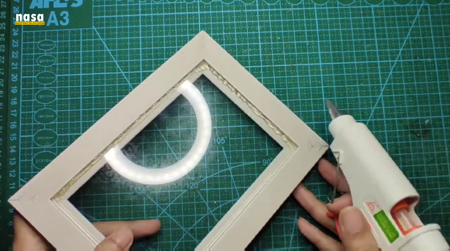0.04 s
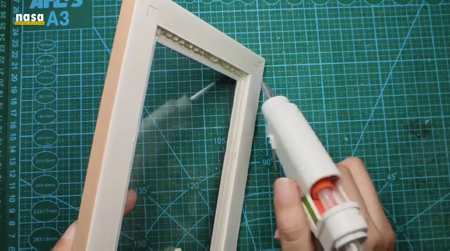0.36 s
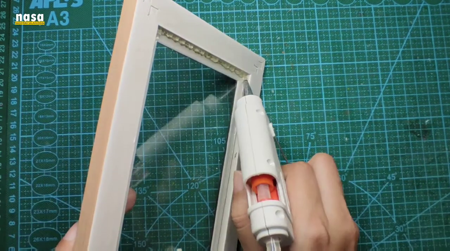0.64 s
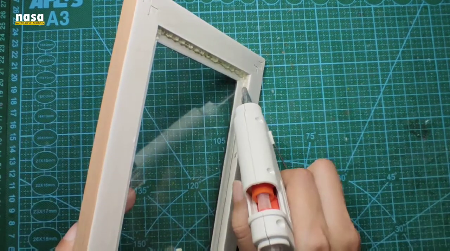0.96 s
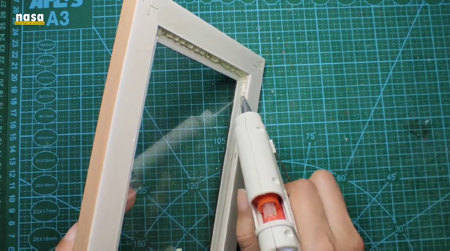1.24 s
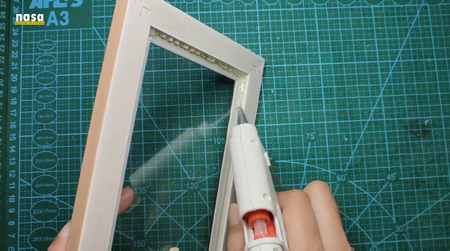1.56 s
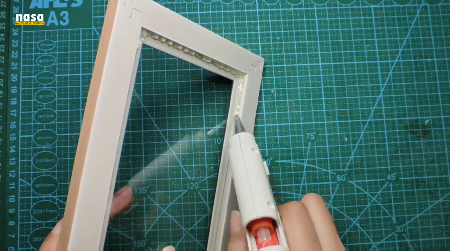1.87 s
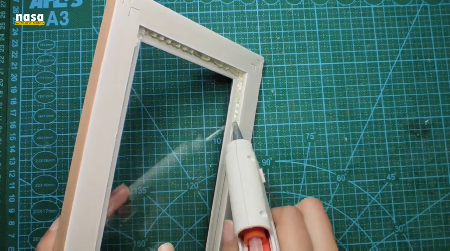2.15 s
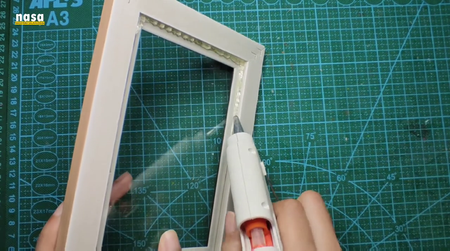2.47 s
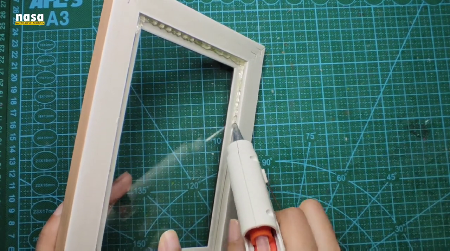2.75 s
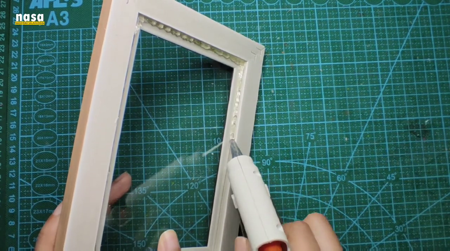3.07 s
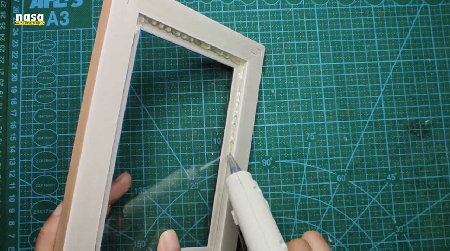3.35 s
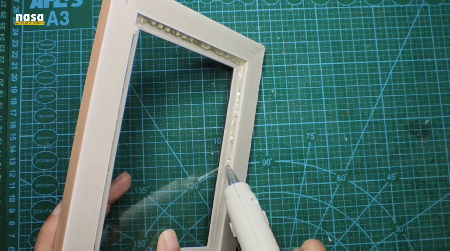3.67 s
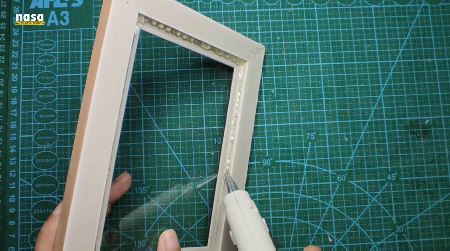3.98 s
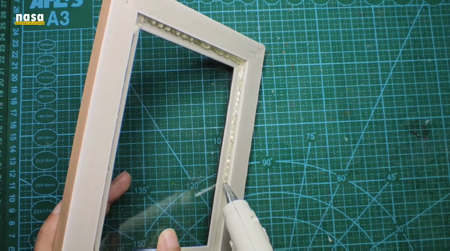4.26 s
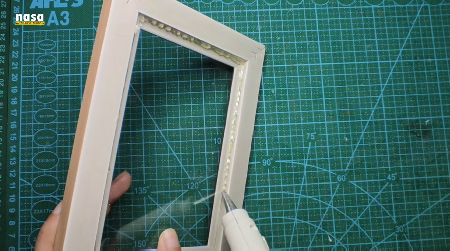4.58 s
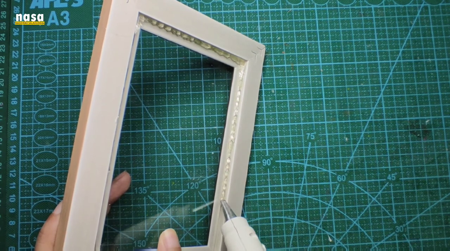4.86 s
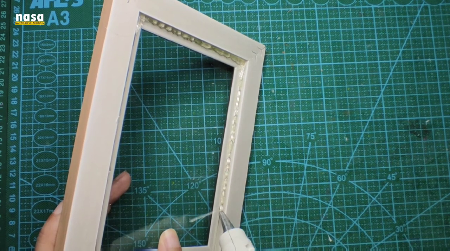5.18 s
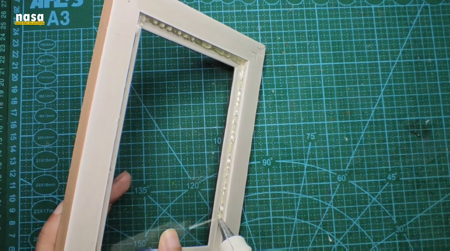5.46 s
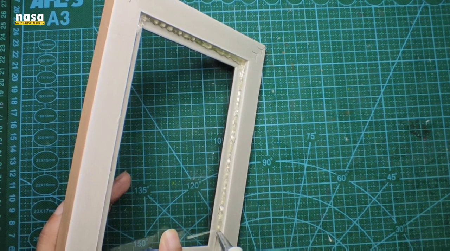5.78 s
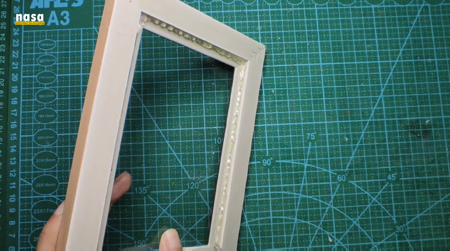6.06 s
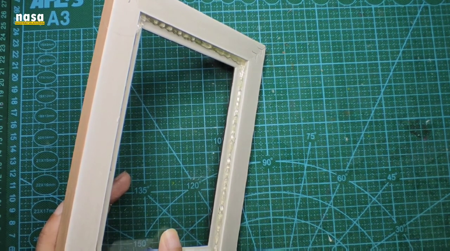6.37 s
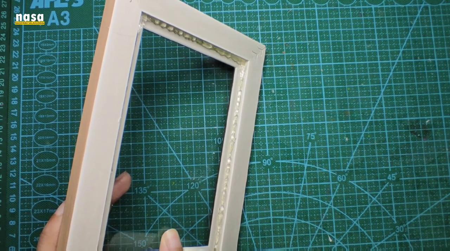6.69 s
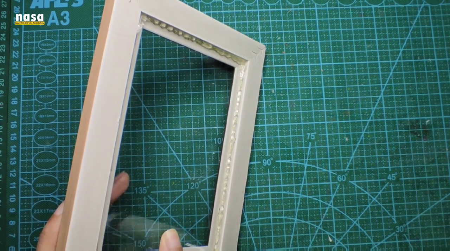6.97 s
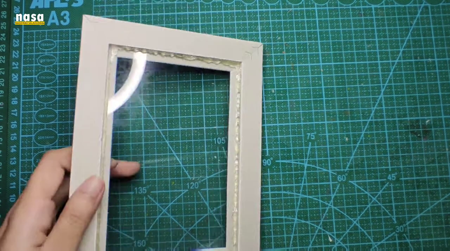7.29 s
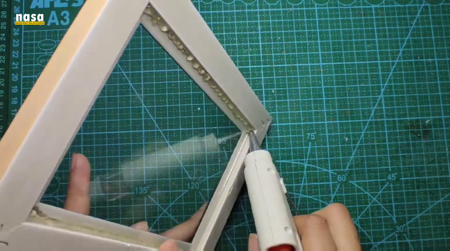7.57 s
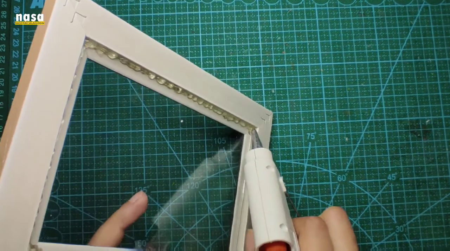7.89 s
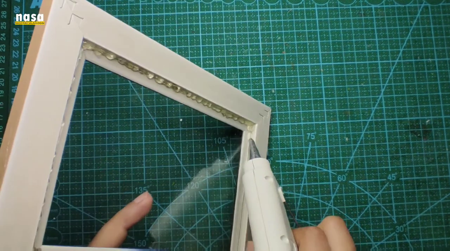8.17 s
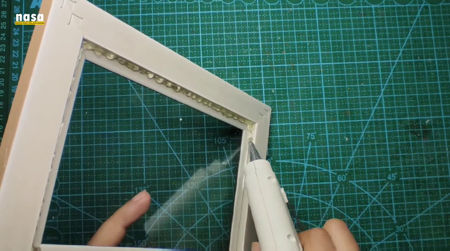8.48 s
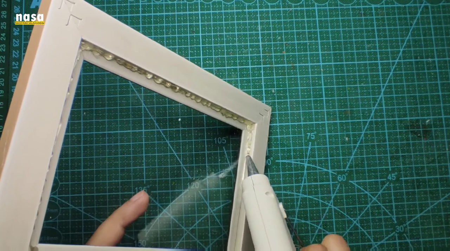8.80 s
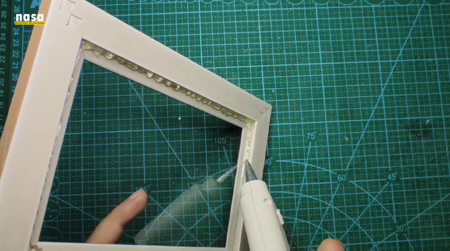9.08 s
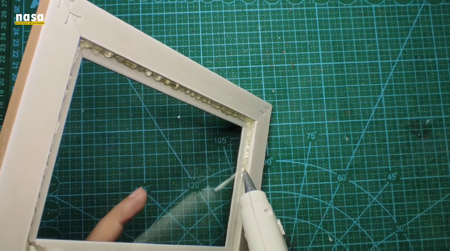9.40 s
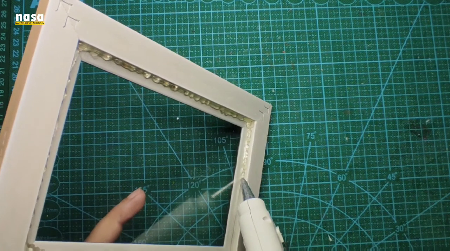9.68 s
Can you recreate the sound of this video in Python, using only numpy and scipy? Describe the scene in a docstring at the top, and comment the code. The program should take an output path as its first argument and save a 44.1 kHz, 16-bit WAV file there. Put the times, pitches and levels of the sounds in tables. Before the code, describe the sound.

Small plastic creaks, ticks and faint spring squeaks from a glue gun, with soft table thuds and uneven rumbling underneath.

```python
"""A wooden picture frame taps down and slides over the mat of a thudding craft table; then a hot glue
gun creaks close by as it lays a bead. Each squeeze of the trigger is a run of tiny stick-slip pulses
that ring the plastic shell, and its spring squeaks softly and ticks between squeezes.
Hands and frame jostle the table, which thuds, judders and rumbles; the rumble lulls at a hard squeeze.
Under it all lie a faint rustle of skin and the steady air of the room."""
import sys
import numpy as np
from scipy import signal
from scipy.fft import rfft, irfft, next_fast_len
from scipy.io import wavfile
from scipy.ndimage import map_coordinates

SR = 44100
rng = np.random.default_rng(int(sys.argv[2]) if len(sys.argv) > 2 else 0)


def waveform_to_disk(signal):
    """Save audio, clipped to [-1, 1], as 16-bit WAV at the path in sys.argv[1]."""
    frames = np.transpose(np.atleast_2d(signal))
    scaled = np.clip(frames, -1, 1) * 32767
    samples = np.round(scaled).astype(np.int16)
    wavfile.write(sys.argv[1], SR, samples)


N = 429534

# Levels in all tables are relative; each source applies its own gain.
# trigger creaks: t/s, duration/s (0 is a single click), slip level/dB
CREAKS = [(0.837, 0.017, -38.5), (.961, 0.0027, -34), (1.389, 0, -35), (1.4357, 0, -32),
          (1.455, 0.00085, -36), (1.483, 0.026, -44.5), (1.516, 0.0019, -32), (1.664, 0.034, -34.5),
          (1.72, 0.009, -41), (1.752, 0, -32), (1.912, 0.005, -44), (2.546, 0.019, -39),
          (2.776, 0.0038, -29), (2.818, 0.0031, -33), (3.042, 0.00084, -33.5), (3.2276, 0.0023, -39),
          (3.3794, 0.02, -41), (3.407, 0.011, -35.5), (3.436, 0.0025, -28), (3.4928, 0.011, -37),
          (3.7303, 0.04, -31), (4.111, 0.0019, -39), (4.131, 0.024, -33), (4.1963, 0.013, -33.5),
          (4.407, 0.015, -44.5), (4.432, 0.018, -32.5), (4.609, 0.016, -33), (4.7943, 0.016, -33),
          (4.984, 0.028, -34.5), (5.101, 0.0054, -35.5), (5.291, 0.0003, -29.5), (5.466, 0.019, -33),
          (5.5043, 0.002, -31.5), (5.628, 0.019, -35), (5.815, .019, -33), (5.869, 0.013, -32),
          (6.093, 0.018, -39), (6.325, 0.0046, -38.5), (6.74, 0.015, -32.5), (6.776, 0.00077, -30),
          (6.8835, 0, -33), (8.19, 0.0042, -47.5), (8.253, 0.0016, -38.5), (8.531, 0.0064, -32),
          (8.685, 0.0049, -27.5), (8.745, 0.0095, -36.5), (9.0, 0.0025, -41), (9.013, 0.018, -44.5),
          (9.1456, 0.019, -35.5), (9.375, 0.016, -38), (9.5, 0, -33), (9.554, 0.0059, -41.5)]
# dull knocks through the table: t/s, level/dB
KNOCKS = [(.073, -17), (0.193, -20), (.341, -21.5), (0.422, -28.5), (.482, -20), (0.678, -16.5),
          (.809, -16), (0.919, -26), (1.027, -18), (1.157, -17), (1.195, -17), (1.261, -28.5), (1.438, -26),
          (1.468, -27), (1.641, -17), (1.706, -21.5), (1.772, -21.5), (1.926, -30.5), (1.955, -25.5),
          (2.035, -19.5), (2.091, -17), (2.189, -31), (2.304, -21.5), (2.492, -21), (2.565, -16),
          (2.669, -18.5), (2.942, -16), (3.367, -23), (3.413, -18.5), (3.506, -19), (3.614, -20.5),
          (3.922, -33.5), (3.967, -27), (4.022, -29), (4.107, -21), (4.163, -25), (4.246, -14.5),
          (4.354, -20), (4.412, -20), (4.469, -23), (4.54, -22), (4.715, -24.5), (4.817, -25), (5.005, -17),
          (5.046, -29.5), (5.19, -23.5), (5.716, -26.5), (5.779, -28.5), (5.963, -27), (6.13, -23),
          (6.257, -21.5), (6.36, -16.5), (6.391, -23.5), (6.825, -26), (6.947, -30), (7.087, -25.5),
          (7.143, -28.5), (7.19, -27.5), (7.283, -25), (7.335, -23.5), (7.466, -25), (7.584, -25.5),
          (7.645, -22), (7.74, -29.5), (7.846, -30), (7.945, -27), (8.039, -25), (8.14, -22), (8.24, -19.5),
          (8.287, -30), (8.468, -24), (8.533, -28), (8.812, -25), (9.004, -17), (9.16, -25.5),
          (9.213, -21.5), (9.344, -18.5), (9.523, -17.5)]
# modes of the trigger spring: f/Hz, bandwidth/Hz, level/dB
SPRING_MODES = [(2460, 340, 3.5), (4426, 790, 2.5), (6270, 450, -4), (7200, 590, 3), (8080, 340, 1.5),
                (9180, 480, 1)]
# spectrum of the table top's vibration: f/Hz, level/dB
TOP_SPECTRUM = [(40, -24), (100, -1.5), (165, 4), (250, -5.5), (400, -20.5), (560, -30), (1500, -68),
                (5000, -120)]
# spectrum of the table's slow sway: f/Hz, level/dB
SWAY_SPECTRUM = [(12, -22), (28, 0.5), (55, -4.5), (90, -4), (130, -23.5), (400, -89), (2000, -120)]
# spectrum of skin friction: f/Hz, level/dB
SKIN_SPECTRUM = [(2000, -5), (4000, -13), (7500, -1.5), (9200, -3), (10500, -21), (16000, -35.5)]


def trigger(first_gap_s=0.0033, slowing=1.27, max_gaps=16, alike=0.63,
            swell_db=5, arch_db=5, scatter_db=2.5, level_db=-3):
    """Stick-slip friction: gaps widen as a squeeze slows, and the slips tend to peak past its middle."""
    slips = np.zeros(N)
    for onset, duration, db in CREAKS:
        jitter, scatter = rng.standard_normal((2, max_gaps))
        grains = rng.standard_normal((max_gaps + 2, SR // 10))
        gaps = first_gap_s * slowing ** np.arange(max_gaps) * np.exp(0.15 * jitter)
        times = np.append(0, np.cumsum(gaps))
        count = np.argmin(np.abs(times - duration)) + 1
        progress = times[:count] / max(times[count - 1], 1e-6)
        start = onset - grains.shape[1] // 4 / SR
        for u, luck, own in zip(progress, scatter, grains):
            # the slips of one creak share a contact point, so part of their waveform
            grain = np.sqrt(alike) * grains[-1] + np.sqrt(1 - alike) * own
            strain_db = swell_db * (u - 0.5) + arch_db * (np.sin(np.pi * u) - 0.5) + scatter_db * luck
            gain = amp(db + level_db + strain_db * (count > 2))
            add(slips, start + u * duration, gain * slip(grain))
    return shell(slips)


def slip(grain, rise_s=0.00091, creep_s=0.0022, rattle_t60=0.064, ring_t60=0.074):
    """Release of strain: gritty creep, a snap a quarter into the grain, then a rattle and a faint ring."""
    t = (np.arange(len(grain)) - len(grain) // 4) / SR
    after = np.maximum(t, 0)
    creep = amp(-19) * np.exp(-np.abs(t) / creep_s)
    snap = (after / rise_s * np.exp(1 - after / rise_s)) ** 2
    tail = amp(-14 - 60 * after / rattle_t60) + amp(-27 - 60 * after / ring_t60)
    envelope = snap + np.where(t < 0, creep, tail)
    burst = envelope * grain
    return burst * np.sqrt(np.sum(envelope ** 2) / np.sum(burst ** 2))


def shell(slips, chirp_s=0.00158, chirp_top_hz=10100, body_hz=6500, grip_db=3.5):
    """Resonance: slips ring the gun's shell, while the shifting grip varies its body and each mode."""
    # spectrum of the plastic shell: f/Hz, level/dB
    spectrum = [(500, -22), (1200, -18), (2000, -24), (3200, -19.5), (4500, -15.5), (5800, -13.5),
                (7400, -5.5), (8900, 2.5), (9500, -5), (10300, -20.5), (12300, -34), (13700, -27),
                (15500, -49)]
    # its modes: f/Hz, bandwidth/Hz, level/dB
    modes = [(4580, 240, -0.5), (7330, 110, 5), (8900, 130, -8.5), (9270, 110, -2)]
    f = grid()
    group_delay = chirp_s * (np.minimum(f / chirp_top_hz, 1) ** 4 - 0.5)  # each slip chirps upwards
    response = colour(spectrum) * np.exp(-2j * np.pi * np.cumsum(group_delay) * f[1])
    whole = np.linalg.norm(response * (1 + resonances(modes)))
    body = response / (1 + (f / body_hz) ** 6)
    gripped = [body] + [response * resonances([mode]) for mode in modes]
    parts = [(0.91, response - body)]  # the treble above the body keeps a constant gain
    parts += [(unit(amp(grip_db * wobble(7.7))), part) for part in gripped]
    return sum(filtered(slips * grip, part) * np.linalg.norm(part) / whole for grip, part in parts)


def spring_squeaks(half_width_s=0.0099, slips_per_s=2500, sag_octaves_per_s=5.4,
                   detune=0.041, vary_db=2.5, brightening=0.5, level_db=-3):
    """Friction excitation: fast, uneven slips drive the spring's modes, which sag as it relaxes."""
    # soft rasping squeaks: peak t/s, level/dB
    squeaks = [(1.224, -47.5), (1.592, -43), (1.808, -49), (1.975, -48), (2.18, -45), (2.409, -47.5),
               (2.624, -52.5), (3.3, -46.5), (3.666, -51.5), (4.005, -45.5), (4.315, -50.5), (4.705, -46),
               (4.899, -51), (5.351, -53), (5.731, -49.5), (5.983, -50.5), (6.231, -48.5), (6.588, -46.5),
               (7.217, -44.5), (8.586, -41), (8.751, -42), (8.931, -48.5), (9.084, -48), (9.223, -46)]
    out, t = np.zeros(N), np.arange(-2048, 2048) / SR
    f = np.fft.rfftfreq(len(t), 1 / SR)
    hz, width, mode_db = np.transpose(SPRING_MODES)
    mean_db = np.mean(squeaks, axis=0)[1]
    slowed = t - np.log(2) * sag_octaves_per_s * t ** 2 / 2
    stroke = np.exp(-(t / half_width_s) ** 2)
    for peak, db in squeaks:
        shift, luck = rng.standard_normal((2, len(hz)))
        tilt_db = brightening * (db - mean_db) * np.log2(hz / hz[0])  # louder is brighter
        modes = zip(hz * np.exp(detune * shift), width, mode_db + vary_db * luck + tilt_db)
        slips = (rng.random(len(t)) < slips_per_s / SR) * rng.standard_normal(len(t))
        ringing = irfft(rfft(slips) * spring_response(modes, f))
        squeak = stroke * map_coordinates(ringing, [(slowed - t[0]) * SR])
        add(out, peak + t[0], amp(db + level_db) * unit(squeak) * np.sqrt(np.mean(stroke ** 2)))
    return out


def spring_ticks(t60=0.02, level_db=-4):
    """Transient excitation: the spring snaps back, sending a short burst through its modes."""
    # dry ticks: t/s, level/dB
    ticks = [(2.4316, -45), (2.886, -45.5), (4.0276, -35.5), (4.5163, -47.5)]
    burst = amp(level_db) * decays(ticks, t60) * rng.standard_normal(N)
    return filtered(burst, spring_response(SPRING_MODES))


def spring_response(modes, f=None):
    """Selective resonance: squared magnitudes give the spring steep peaks with little between them."""
    return sum(amp(db) * np.abs(resonances([(hz, width, 0)], f)) ** 2 for hz, width, db in modes)


def table_knocks(table_hz=188, rise_s=0.0032, hardening=0.95, level_db=-4,
                 push_hz=55, push_rise_s=0.013, push_db=-9.5, swell_s=0.012, fade_s=0.017, shake_db=-11.5):
    """Damped vibration: a soft blow swings the table's modes, over a slow push and amid a shudder."""
    out, shaking, t = np.zeros(N), np.zeros(N), np.arange(SR // 5) / SR
    swing = t / rise_s * np.exp(1 - t / rise_s) * (1 - np.exp(-2 * t / rise_s))
    heave = (t / push_rise_s * np.exp(1 - t / push_rise_s)) ** 2
    lead_s = 4 * swell_s
    shake = np.exp(np.minimum((t - lead_s) / swell_s, (lead_s - t) / fade_s))
    ratio, mode_db = np.transpose([(0.994, 0.0), (0.43, -5.5), (1.634, -12.0), (2.315, -20.5)])
    mean_db = np.mean(KNOCKS, axis=0)[1]
    for onset, db in KNOCKS:
        hz = table_hz * np.exp(0.1 * rng.standard_normal())  # each blow lands on another spot
        phase = rng.uniform(0, 2 * np.pi, size=len(ratio))
        gains = amp(mode_db + hardening * (ratio - 1) * (db - mean_db))  # harder blows reach higher modes
        modes = np.sin(2 * np.pi * hz * np.outer(t, ratio) + phase) @ gains
        low_hz = push_hz * np.exp(0.22 * rng.standard_normal())
        push = heave * np.sin(2 * np.pi * low_hz * t + phase[-1])
        add(out, onset, amp(db + level_db) * swing * modes)
        add(out, onset - push_rise_s / 2, amp(db + push_db) * push)
        add(shaking, onset - lead_s, amp(db + shake_db) * shake)
    return out + filtered(shaking * rng.standard_normal(N), colour(TOP_SPECTRUM))


def hand_rubs(edge_s=0.0053, slip_hz=205, rough_db=4, grit_db=-4, sway_db=-3, level_db=-3):
    """Relaxation oscillation: a dragging hand slips quickly and unevenly; the table judders and sways."""
    # drags of a hand: t/s, duration/s, level/dB
    drags = [(0.523, 0.078, -29), (0.69, 0.062, -31), (0.879, 0.066, -32), (1.042, 0.1, -29),
             (1.153, 0.057, -28.5), (2.006, 0.094, -32), (2.648, 0.066, -31.5), (2.973, 0.061, -29),
             (3.087, 0.045, -29), (3.212, 0.1, -36), (4.418, 0.065, -34), (4.963, 0.034, -31.5),
             (5.348, 0.065, -32.5), (6.01, 0.061, -35.5), (6.445, 0.062, -29), (6.627, 0.12, -36),
             (7.401, 0.094, -33.5), (8.361, 0.041, -28.5), (9.32, 0.12, -27), (9.495, 0.077, -26.5),
             (9.577, 0.2, -28.5)]
    t, envelope = clock(), np.zeros(N)
    for onset, duration, db in drags:
        gate = (np.tanh((t - onset) / edge_s) - np.tanh((t - onset - duration) / edge_s)) / 2
        envelope += amp(db + level_db) * gate
    rate = slip_hz * np.exp(0.2 * wobble(20) + 0.25 * wobble(slip_hz))
    cycles = np.cumsum(rate) / SR
    slips = np.diff(np.floor(cycles), prepend=0) * amp(rough_db * wobble(slip_hz))
    top = colour(TOP_SPECTRUM)
    judder = unit(unit(filtered(slips - slips.mean(), top)) + amp(grit_db) * noise(top))
    return envelope * (judder + amp(sway_db) * noise(colour(SWAY_SPECTRUM)))


def table_rumble(effort_db, bumps_per_s=180, lumpy_db=5.5, shudder_db=-8, hard_db=-25, sway_db=-5):
    """Forced vibration: random bumps shake the top over its slow sway, more so under firm handling."""
    lumps = unit(amp(lumpy_db * wobble(22)))
    impulses = (rng.random(N) < bumps_per_s / SR) * rng.choice([-1, 1], N)
    bumps = unit(impulses) * lumps * amp(effort_db)
    firmness_db = effort_db - np.mean(effort_db)
    top = colour(TOP_SPECTRUM)
    upper_band = top * resonances([(340, 170, 0)]) ** 2
    shudder = filtered(bumps * amp(0.74 * firmness_db + shudder_db), top)
    hard = filtered(bumps * amp(0.33 * firmness_db + hard_db), upper_band)
    sway = np.sqrt(lumps) * amp(effort_db + sway_db) * noise(colour(SWAY_SPECTRUM))
    return shudder + hard + sway


def hand_effort(steady_s=0.02, lag_s=0.011, lift_db=1, lift_lead_s=0.074, lift_s=0.0054):
    """Amplitude modulation in dB: jostling lulls at hard squeezes and rises a little before each knock."""
    # slow course of the jostling: t/s, level/dB
    jostle = [(0, -47), (.63, -33), (1.37, -54), (2.07, -37), (2.8, -48), (3.1, -36), (3.82, -55),
              (4.25, -35), (5.5, -47), (6.38, -39.5), (7.7, -43), (8.3, -34), (8.62, -46), (9.45, -34)]
    mean_db = np.mean(CREAKS, axis=0)[2]
    lull = np.zeros(N)
    for onset, duration, db in CREAKS:
        depth_db = 2.2 * (db - mean_db) - 2.5  # the harder the creak, the steadier the hands
        lull = np.maximum(lull, depth_db * bell(onset + duration / 2 + lag_s, steady_s + duration / 2))
    lift = sum(bell(onset - lift_lead_s, lift_s) for onset, _ in KNOCKS)
    return np.interp(clock(), *np.transpose(jostle)) - lull + lift_db * lift


def frame(tap_t60=0.045, grain_db=3, crack_db=-15):
    """Impact and sliding friction: the frame's modes sound as it taps and rubs the mat; skin hisses."""
    # slides over the mat: peak t/s, half-width/s, rub level/dB, hiss level/dB
    slides = [(0.135, 0.038, -60, -60), (0.227, 0.011, -67, -59), (0.363, 0.033, -45, -52),
              (7.643, 0.063, -51.5, -56)]
    # the frame taps down: t/s, level/dB
    taps = [(0.0602, -33.5), (0.0717, -49)]
    # modes of the wood: f/Hz, bandwidth/Hz, level/dB before the response is squared
    wood_modes = [(450, 120, 1.5), (703, 190, 0), (1013, 380, -1.5), (1620, 200, -2), (2530, 420, -4)]
    t, rub, hiss = clock(), np.zeros(N), np.zeros(N)
    for peak, half_width, rub_db, hiss_db in slides:
        stroke = np.exp(-np.minimum(np.abs((t - peak) / half_width) ** 3.4, 20) / 2)
        rub += amp(rub_db) * stroke
        hiss += amp(hiss_db) * stroke
    tap = decays(taps, tap_t60)
    grain = unit(amp(grain_db * wobble(250)))
    modes = [np.abs(resonances([mode])) ** 2 for mode in wood_modes]
    whole, middle = noise(sum(modes)), noise(sum(modes[1:3]))
    firmness = (rub / rub.max()) ** 2  # a light rub stirs only the middle modes
    wood = rub * grain * (firmness * whole + np.sqrt(1 - firmness ** 2) * middle) + tap * whole
    return wood + (hiss * grain + amp(crack_db) * tap) * noise(colour(SKIN_SPECTRUM))


def finger_rustle(level_db=-78, patchy_db=6, patches_per_s=25):
    """Friction noise: skin shifts on the gun and the frame in faint patches."""
    return amp(level_db + patchy_db * wobble(patches_per_s)) * noise(colour(SKIN_SPECTRUM))


def room(level_db=-61.5, above_hz=600):
    """Stationary noise: air and microphone hiss, with the level set for the part above the rumble."""
    # background spectrum: f/Hz, level/dB
    spectrum = [(25, 12.5), (170, -0.5), (280, -16.5), (550, -17.5), (635, -9.5), (730, -16.5),
                (830, -11.5), (920, -19), (1230, -18), (1600, -25.5), (5600, -43), (7600, -29),
                (8300, -36.5), (9200, -33), (10400, -51.5), (16000, -73.5)]
    air = noise(colour(spectrum))
    upper = signal.sosfilt(signal.butter(4, above_hz, "high", fs=SR, output="sos"), air)
    return amp(level_db) * air / np.std(upper)


def amp(db):
    """Amplitude ratio of a level in decibels."""
    return 10 ** (np.asarray(db) / 20)


def unit(x):
    """Normalisation to an rms of 1."""
    return x / np.sqrt(np.mean(x ** 2) + 1e-20)


def clock():
    """Sample times in seconds."""
    return np.arange(N) / SR


def add(track, onset, sound):
    """Superposition: mix a sound into the track from its onset in seconds."""
    i = int(np.clip(round(onset * SR), 0, N - 1))
    track[i:i + len(sound)] += sound[:N - i]


def decays(events, t60):
    """Exponential decay: an envelope falling 60 dB in t60 seconds from each (t/s, level/dB) event."""
    t = clock()
    return sum(amp(db - 60 * np.clip(t - onset, 0, 0.5) / t60) * (t >= onset) for onset, db in events)


def bell(centre_s, half_width_s):
    """Gaussian pulse of height 1."""
    bump = np.zeros(N)
    edges = (centre_s + np.array([-4, 4]) * half_width_s) * SR
    near = np.arange(*np.clip(edges, 0, N).astype(int))
    bump[near] = np.exp(-((near / SR - centre_s) / half_width_s) ** 2)
    return bump


def wobble(rate):
    """Smooth random modulation, with rate knots a second."""
    return map_coordinates(rng.standard_normal(int(N * rate / SR) + 4), [clock() * rate])


def grid():
    """Frequencies of the zero-padded Fourier transform."""
    return np.fft.rfftfreq(2 * next_fast_len(N // 2 + 8192), 1 / SR)


def colour(points):
    """Minimum-phase response through (f/Hz, level/dB) points."""
    hz, db = np.transpose(points)
    gain = amp(np.interp(np.log(grid() + 1), np.log(hz), db))
    cepstrum = irfft(np.log(gain))
    half = len(cepstrum) // 2
    cepstrum[1:half] *= 2
    cepstrum[half + 1:] = 0
    return np.exp(rfft(cepstrum))


def resonances(modes, f=None):
    """Modal sum of damped oscillators (f/Hz, bandwidth/Hz, level/dB)."""
    f = grid() if f is None else f
    return sum(amp(db) * 1j * f * width / (hz * hz - f * f + 1j * f * width) for hz, width, db in modes)


def filtered(x, response):
    """Convolution with a response scaled to keep the power of white noise."""
    spectrum = rfft(x, 2 * len(response) - 2)
    return irfft(spectrum * response / np.sqrt(np.mean(np.abs(response) ** 2)))[:N]


def noise(response):
    """Gaussian noise coloured by a response, at an rms of 1."""
    return unit(filtered(rng.standard_normal(N), response))


def scene():
    """Superposition of gun, table and frame, close and dry, in one channel."""
    bed = room() + table_rumble(hand_effort()) + frame() + finger_rustle()
    gun = spring_squeaks() + spring_ticks() + trigger()
    return (bed + gun + hand_rubs() + table_knocks())[None]


def record(dry, cutoff_hz=15700):
    """Band limiting: an ideal low-pass filter removes everything above the cutoff."""
    f = grid()
    return irfft(rfft(dry, 2 * len(f) - 2) * (f < cutoff_hz))[:, :N]


dry = scene()
out = record(dry)
waveform_to_disk(out)
```